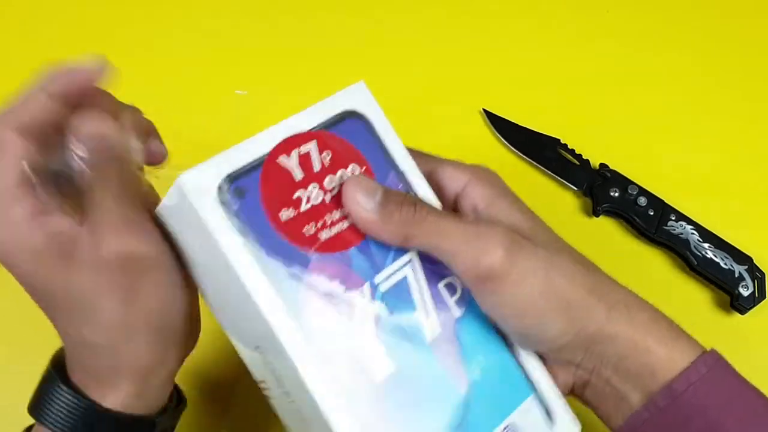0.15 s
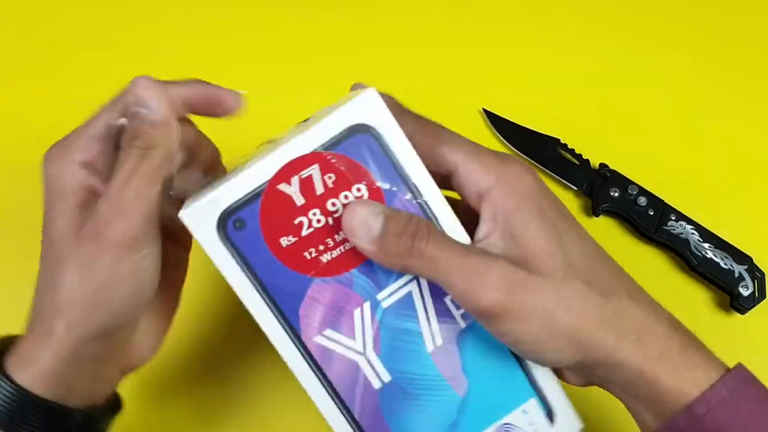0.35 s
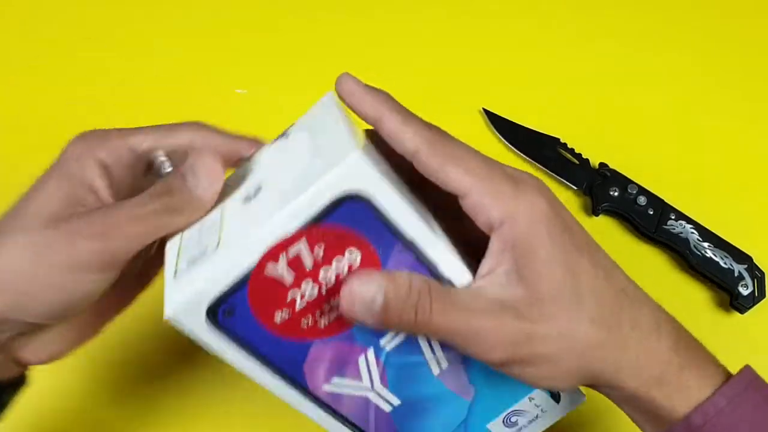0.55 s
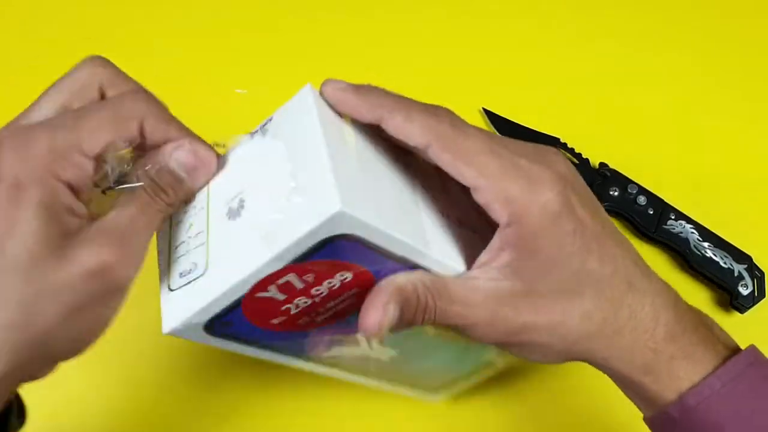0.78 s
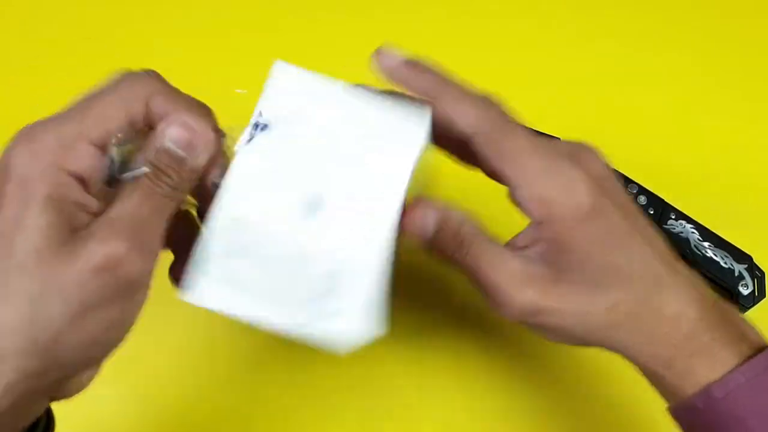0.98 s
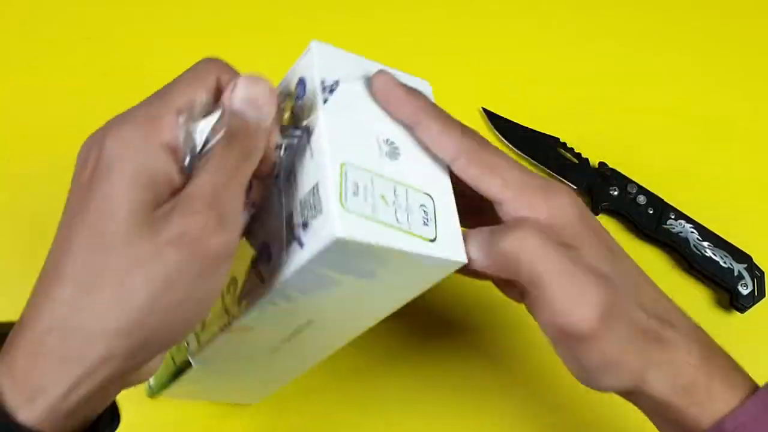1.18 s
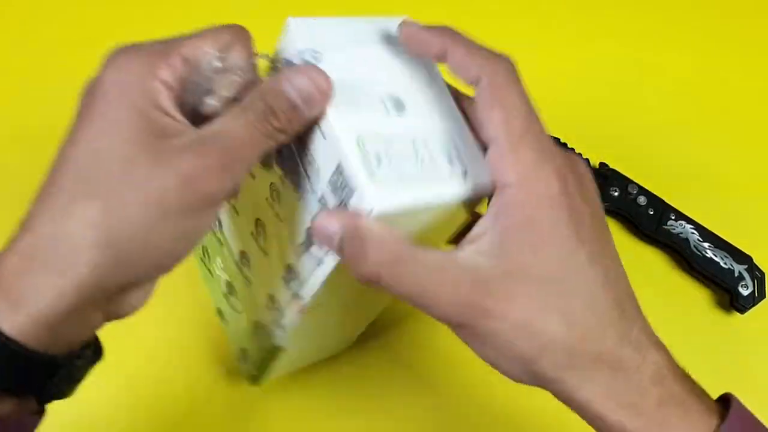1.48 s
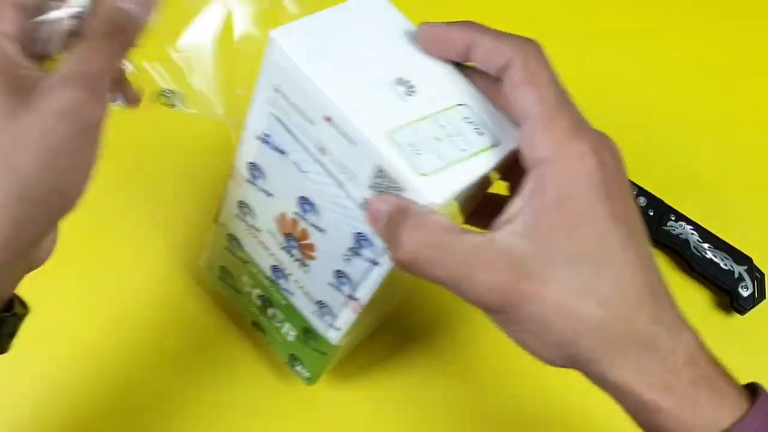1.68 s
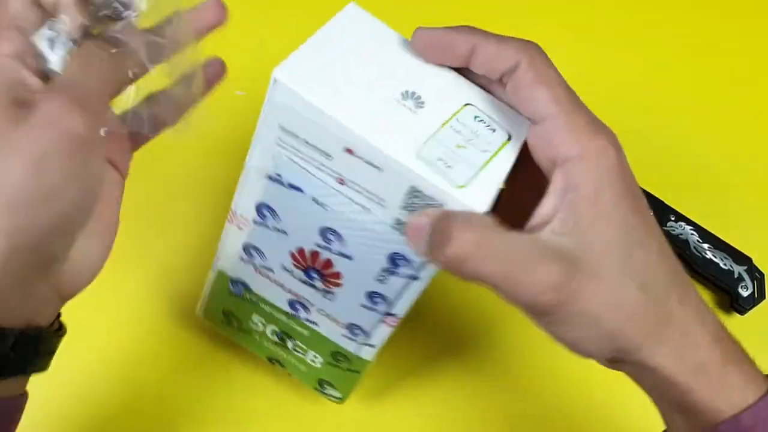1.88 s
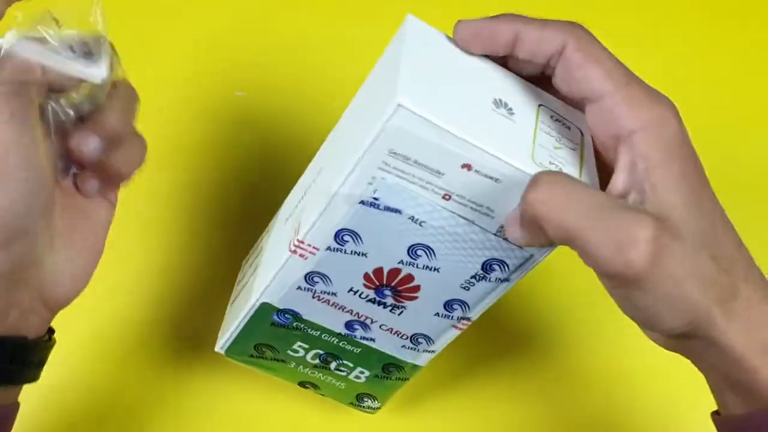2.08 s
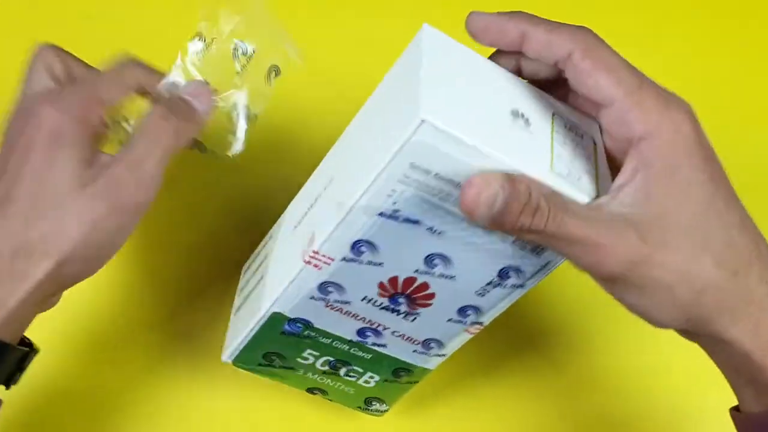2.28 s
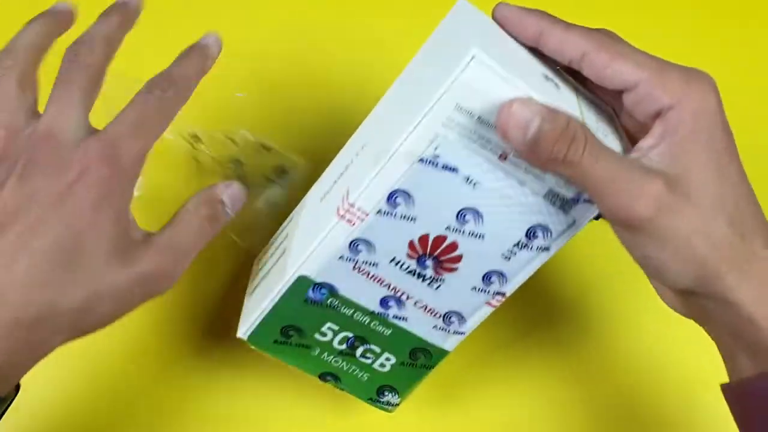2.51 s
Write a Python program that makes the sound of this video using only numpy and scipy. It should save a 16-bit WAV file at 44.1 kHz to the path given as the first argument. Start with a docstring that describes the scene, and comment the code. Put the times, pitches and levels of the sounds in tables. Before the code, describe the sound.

Thin plastic wrap crinkles close to the microphone as it is pulled off a cardboard box. The box bumps dully a few times, and the scrunching grows louder with sharp snaps, then eases, in a small room.

```python
"""Thin plastic shrink wrap is pulled off a cardboard box and scrunched in one hand, in a small room.
From the start, tiny creases crackle, sliding film rustles and bigger creases buckle in sharp snaps.
Soon the box is turned over and bumps on the table, again and again. Halfway through, the film slips
over an edge with a thin hiss. The scrunching gets louder, then eases. The room rings after each sound."""
import sys
import numpy as np
from scipy import signal
from scipy.fft import rfft, irfft
from scipy.io import wavfile
from scipy.ndimage import uniform_filter1d

SR = 44100
rng = np.random.default_rng(int(sys.argv[2]) if len(sys.argv) > 2 else 0)


def digitize_waveform(pressure):
    """Quantize a signal to 16-bit integers and store it at the path in sys.argv[1].

    Rows of a 2-D input are taken as channels; values are limited to [-1, 1].
    """
    field = np.atleast_2d(pressure).T
    bounded = np.clip(field, -1, 1)
    quanta = np.round(bounded * 32767).astype(np.int16)
    wavfile.write(sys.argv[1], SR, quanta)


N = 116865
TIME_S = np.arange(N) / SR
SIZE, CRACK_AT = 2048, 128  # in samples: the space for building one click, and where its crack falls
BINS_HZ = np.fft.rfftfreq(SIZE, 1 / SR)
RING_OCTAVES = 0.17  # width of the pitch band in which a patch of film rings


def amp(db):
    """Turns decibels into a number to multiply a sound by."""
    return 10 ** (np.asarray(db) / 20)


def unit(x):
    """Scales a sound to an average (rms) level of 1."""
    return x / np.sqrt(np.mean(x ** 2) + 1e-20)


def read(points, hz):
    """Looks up a table's value at any pitch, gliding between its rows."""
    pitch_hz, value = np.transpose(points)
    return np.interp(np.log(hz + 1), np.log(pitch_hz), value)


def add(mix, start_s, sound):
    """Mixes a sound in at the given time."""
    part = mix[max(round(start_s * SR), 0):][:len(sound)]
    part += sound[:len(part)]


def noise(tone):
    """Steady noise at level 1, shaped by a table of pitch_hz, level_db."""
    gain = amp(read(tone, np.fft.rfftfreq(N, 1 / SR)))
    return unit(irfft(rfft(rng.standard_normal(N)) * gain, N))


def hump(centre_hz, octaves):
    """A bell-shaped curve of height 1 around a pitch."""
    return np.exp(-.5 * (np.log2((BINS_HZ + 1) / centre_hz) / octaves) ** 2)


def struck_filter(tone_db):
    """A filter with the given tone that rings only after it is struck, never before."""
    log_gain = np.log(amp(np.r_[tone_db, tone_db[-2:0:-1]]))
    return np.exp(np.conj(signal.hilbert(log_gain)))[:len(tone_db)]


def buckle(tone_db, flutter_s, crack_share=0.18, creak_share=0.33):
    """One crease flips: a short creak, a sharp crack, then a quickly fading flutter."""
    t = (np.arange(SIZE) - CRACK_AT) / SR
    fade_s = flutter_s * np.where(t < 0, creak_share, 1)
    motion = rng.standard_normal(SIZE) * np.exp(-abs(t) / fade_s)
    motion *= np.sqrt(1 - crack_share) / np.linalg.norm(motion)
    motion[CRACK_AT] -= np.sqrt(crack_share)
    spectrum = rfft(motion)
    spectrum /= np.sqrt(uniform_filter1d(abs(spectrum) ** 2, size=50))  # even out chance peaks
    click = irfft(spectrum * struck_filter(tone_db))[:SIZE // 2]
    return click / np.linalg.norm(click)


def crackle(effort_db, patches=32, ring_db=9.5, size_spread_db=4.5):
    """Tiny creases flip on patches of film of many pitches; harder work flips more of them."""
    # tone of the tiny creases: pitch_hz, level_db
    crackle_tone = [(100, -8), (400, -28), (800, -30), (1300, 1), (2100, 1), (3200, 1.5), (4500, 1),
                    (6500, -1.5), (9000, -7.5), (12000, -15.5), (16000, -48)]
    crowding = amp(0.58 * effort_db)
    clicks_per_s = 500 * crowding
    sizes = amp(size_spread_db * np.minimum(rng.exponential(1, N), 3)) / np.sqrt(crowding)
    sizes *= rng.random(N) < clicks_per_s / SR
    patch = rng.integers(0, patches, N)
    octaves_up = np.log2(np.maximum(BINS_HZ, 1000) / 1000)
    out = np.zeros(N)
    for k, ring_hz in enumerate(np.geomspace(1800, 11000, patches)):
        brightness_db = 1.5 * rng.uniform(-0.81, 1) * octaves_up
        tone_db = read(crackle_tone, BINS_HZ) + ring_db * hump(ring_hz, RING_OCTAVES) + brightness_db
        click = buckle(tone_db, flutter_s=0.0013)
        out += signal.oaconvolve(sizes * (patch == k), click)[CRACK_AT:][:N]
    return amp(effort_db - 48.5) * unit(out)


def rustle(effort_db):
    """Sliding film rustles; this changes less with the hand's effort than the crackle does."""
    # tone of sliding film: pitch_hz, level_db
    rustle_tone = [(100, 0.5), (300, -3.5), (700, 4), (1300, 3), (2200, -8), (4500, 3), (8000, -3),
                   (12000, -14), (16000, -13)]
    # how much the film slides as it is worked: time_s, level_db
    sliding = [(1.15, 1), (1.34, -5), (1.62, -6), (1.72, 1)]
    sliding_db = np.interp(TIME_S, *np.transpose(sliding))
    return amp(0.81 * effort_db + sliding_db - 53.5) * noise(rustle_tone)


def scrunch(medium_db=-47):
    """The hand works the film, and both crackle and rustle follow its effort."""
    # how hard the film is worked: time_s, level_db
    hand_work = [(0, -48.5), (.176, -74), (0.188, -42), (.31, -38.5), (.345, -45), (.368, -40),
                 (.46, -39.5), (.52, -48.5), (.62, -47.5), (.79, -48), (0.851, -41.5), (.96, -38.5),
                 (1.01, -42), (1.06, -40.5), (1.2, -39), (1.279, -42), (1.351, -33), (1.43, -44.5),
                 (1.521, -38.5), (1.62, -44), (1.699, -37), (1.861, -33), (2.0, -36), (2.12, -37.5),
                 (2.149, -30.5), (2.26, -39), (2.316, -31), (2.43, -43.5), (2.52, -40.5), (2.65, -49.5)]
    effort_db = np.interp(TIME_S, *np.transpose(hand_work)) - medium_db
    return crackle(effort_db) + rustle(effort_db)


def air():
    """The quiet, low hush of the room."""
    # tone of the hush: pitch_hz, level_db
    air_tone = [(25, -26), (50, -23), (95, 8.5), (140, 1), (300, 4.5), (700, -4), (2000, -9), (6000, -9),
                (16000, -36)]
    return amp(-54.5) * noise(air_tone)


def snaps(ring_db=8, boost_db=21, flutter_stretch=2.16):
    """Big creases snap, each with the ring and tone of its own patch of film."""
    # creases, before boost and stretch: start_s, level_db, ring_hz, body_db, treble_db, flutter_s
    creases = [(0.0147, -46, 6250, 29, 13, 0.0012), (0.057, -37, 3200, 14, 6.5, 0.001),
               (0.1369, -34.5, 8300, 6, 5.5, 0.00051), (0.191, -35, 4390, 12, 8, 0.00046),
               (0.198, -28, 3450, -12, 0, 0.00064), (0.2093, -24, 3080, -5, -1.5, 0.0002),
               (0.2194, -30, 4570, -17, -2, 0.00053), (0.2237, -27, 2440, -12, -1, 0.00042),
               (0.2645, -32, 6070, -2, -19, 0.00099), (0.2881, -25.5, 2620, 4, 0, 0.0016),
               (0.306, -27.5, 6200, -5, 9, 0.0003), (0.31, -25.5, 4230, -24, 9.5, 0.0004),
               (0.366, -30.5, 3620, -14, 5, 0.0013), (0.375, -22, 2600, -14, 2.5, 0.00074),
               (0.3871, -27, 6250, -24, 8, 0.00051), (0.4285, -36, 2310, -18, -7, 0.00057),
               (0.4362, -29, 4380, -14, 4, 0.0014), (0.461, -33, 8100, 7, 18, 0.00091),
               (0.477, -31.5, 3450, 3, 2, 0.001), (0.6427, -36.1, 3770, -1, -1, 0.001),
               (0.6603, -36, 7200, 2, 5, 0.00089), (0.6653, -32, 3970, 4, 4, 0.0021),
               (0.7003, -22.5, 5450, 1, -5, 0.00063), (0.7324, -31, 4150, 8, 0, 0.00068),
               (0.7601, -22, 4100, 6, 2, 0.00082), (0.8296, -29, 5750, 2, 5, 0.00026),
               (0.849, -27.5, 4440, 2, 2, 0.0016), (0.8583, -31.5, 6000, 9, 8, 0.0005),
               (0.8847, -28, 3400, 6, -15, 0.00031), (0.902, -25, 6160, -8, 6, 0.00094),
               (0.9418, -27, 7200, 12, 9.5, 0.00058), (0.953, -19, 6400, -42, -9, 0.00033),
               (1.006, -21, 4130, -4, -1, 0.00052), (1.024, -22, 5500, 9.5, 3, 0.00092),
               (1.027, -16.5, 2300, -4.5, 4, 0.00046), (1.0328, -19.5, 3100, -30, -7, 0.0013),
               (1.0365, -15, 4340, -21, 5.5, 0.00022), (1.0455, -22, 7670, -1, -2, 0.00025),
               (1.0587, -14.5, 3270, -10, 8, 0.0004), (1.0756, -25.5, 4050, -2, 5, 0.00026),
               (1.0894, -22.5, 2170, 3, 2, 0.00044), (1.1441, -27, 3750, -3, 3, 0.00068),
               (1.149, -32, 4300, -16, 3, 0.00049), (1.1739, -32.5, 4200, -6, -15, 0.0006),
               (1.1878, -27.5, 9100, 3, -2, 0.00054), (1.196, -31, 7800, 15, 6, 0.0002),
               (1.244, -28, 4460, 0, -39, 0.00046), (1.3118, -23.5, 2080, -15, -41, 0.00058),
               (1.3205, -29.5, 4660, -12, 11, 0.00043), (1.3433, -21, 4170, -10, 1.5, 0.00036),
               (1.3679, -25.5, 7800, 2, 0, 0.00076), (1.3902, -32, 3170, -17, -2, 0.00035),
               (1.4016, -27, 6460, -8, 2, 0.00032), (1.4068, -33, 2450, -19, -20, 0.00064),
               (1.4322, -25, 4650, -3, -1, 0.0011), (1.456, -33, 9200, -11, 5, 0.00074),
               (1.47, -20.5, 4620, -33, -1.5, 0.00073), (1.4837, -23, 1770, 4, -8, 0.00083),
               (1.495, -28, 5500, -10, 4, 0.0003), (1.503, -23, 3900, 3, 1.5, 0.00068),
               (1.5287, -27, 4440, -2, 4, 0.0011), (1.5448, -25, 5800, 7, 8, 0.00078),
               (1.5485, -28, 3800, -14, -2, 0.00033), (1.5705, -33.5, 3060, -12, 4, 0.00028),
               (1.591, -32.5, 4500, 0, -6, 0.00055), (1.6422, -22, 8400, -0.5, -4.5, 0.0006),
               (1.6673, -19, 4900, 7.5, 8.5, 0.00044), (1.679, -23.5, 3930, -2, -9, 0.00045),
               (1.6859, -22.5, 7350, -3, -1, 0.0011), (1.694, -18, 6400, 6.5, 3, 0.0043),
               (1.704, -19.5, 11400, 0, 4.5, 0.00068), (1.7099, -13, 2460, -5, 1.5, 0.0023),
               (1.7343, -16.5, 4330, 10.5, 1, 0.00086), (1.7472, -23, 5760, 3, 1, 0.0015),
               (1.765, -24, 6140, -8, -1, 0.00092), (1.7847, -15, 5400, -13, -1, 0.0011),
               (1.8231, -14, 2150, -4, -5, 0.00053), (1.8415, -25, 3880, 4, 9, 0.00046),
               (1.8453, -23, 2050, -4, 4, 0.00023), (1.8502, -24, 7650, 8, 12, 0.0008),
               (1.8544, -23, 3570, -5, 0, 0.00083), (1.8709, -22.5, 5840, -1, 4, 0.00058),
               (1.9147, -25, 2210, 0, 4, 0.00035), (1.9404, -18.5, 8400, -3, -1, 0.000089),
               (1.968, -22, 4170, -3, -2, 0.00034), (2.0354, -27, 5170, -42, -8, 0.00016),
               (2.0855, -21.5, 3280, -15, -4, 0.00036), (2.1348, -19, 3500, -13, -6, 0.0025),
               (2.141, -23, 3430, -9, 0, 0.0008), (2.1434, -20, 4230, -11, -11, 0.00044),
               (2.2004, -19, 7600, 12.5, 17.5, 0.00066), (2.2043, -20.5, 4800, -3, 3, 0.0041),
               (2.2753, -27.5, 2380, 12, -20, 0.0014), (2.2887, -28, 4400, -11, 7, 0.0017),
               (2.2962, -22, 4450, -7, 8, 0.00095), (2.3098, -24.5, 4350, 14.5, 4, 0.00072),
               (2.3211, -21.5, 4200, 6, 6, 0.0011), (2.3878, -30, 3930, 5, -6, 0.0016),
               (2.396, -27.5, 6000, -14, 3, 0.00062), (2.4019, -28, 2160, 3, -8, 0.001),
               (2.4854, -32.5, 7020, 25, 9.5, 0.002), (2.5107, -29.5, 3900, 17, 2, 0.00086),
               (2.524, -32, 5900, 17, 6, 0.00084)]
    # tone shared by all snaps: pitch_hz, level_db
    film_tone = [(60, -23), (200, -10.5), (400, -9.5), (800, -10.5), (1300, -3), (2100, -2.5), (3000, -1.5),
                 (4200, -1.5), (6000, -4), (8000, -7), (11000, -11.5), (14000, -17), (16000, -26)]
    body = BINS_HZ / (BINS_HZ + 140) / (1 + (BINS_HZ / 1450) ** 4)  # film is too light for deep bass
    treble = 1 - 1 / (1 + (BINS_HZ / 6700) ** 6)
    out = np.zeros(N)
    for start_s, level_db, ring_hz, body_db, treble_db, flutter_s in creases:
        tone_db = read(film_tone, BINS_HZ) + ring_db * hump(ring_hz, RING_OCTAVES)
        tone_db += body_db * body + treble_db * treble
        snap = buckle(tone_db, flutter_stretch * flutter_s)
        add(out, start_s - CRACK_AT / SR, amp(level_db + boost_db) * snap)
    return out


def hollow(film):
    """Close echoes off the box and table make the film sound hollow."""
    # peaks and dips made by the echoes: pitch_hz, level_db
    echo_tone = [(1700, -1), (2250, 3), (2680, -3), (2950, 1), (3220, 2), (3560, -2.5), (3950, 0.5),
                 (4500, 0), (4900, -1), (5200, 0)]
    echoes = irfft(struck_filter(read(echo_tone, BINS_HZ)))[:SIZE // 2]
    return signal.oaconvolve(film, echoes)[:N]


def room(sound, build_s=0.0011):
    """Echoes from the walls blur into a short tail that lasts longest in the bass."""
    # time the room takes to fade by 60 dB: pitch_hz, ring_s
    ring_times = [(100, 0.88), (400, 0.48), (1200, 0.38), (3500, 0.51), (8000, 0.22), (15000, 0.35)]
    # tone of the tail: pitch_hz, level_db
    tail_tone = [(100, -1), (400, -4), (1000, -4.5), (2200, -7.5), (5000, -10), (9000, -9), (15000, -11.5)]
    hz, t, spectrum = signal.stft(rng.standard_normal(SR), SR, nperseg=256)
    ring_s = read(ring_times, hz)[:, None]
    fade = np.exp(-np.log(1000) * t / ring_s)
    same_energy = np.sqrt(2 * np.log(1000) / (ring_s * SR))  # a longer ring adds no extra energy
    spectrum *= fade * amp(read(tail_tone, hz))[:, None] * same_energy
    tail = signal.istft(spectrum, SR, nperseg=256)[1]
    fade_in = np.minimum(np.arange(len(tail)) / SR / build_s, 1)
    return signal.fftconvolve(sound, tail * fade_in)[:N]


def box_bumps(reach_octaves=0.22):
    """Each bump is a dull push with a cardboard scuff; it wakes the low booms near its pitch."""
    # the box hits the table (levels are relative): start_s, level_db, pitch_hz, rise_s, decay_s, scuff_db
    bumps = [(.184, -40, 293, 0.0022, 0.0082, 1.5), (0.507, -38.5, 196, 0.003, 0.0091, -1.5),
             (0.532, -26, 64.5, 0.012, 0.023, -10.5), (.548, -37.5, 168, 0.0047, 0.012, -15),
             (0.647, -34.5, 80, 0.0022, 0.0071, -3), (1.025, -28, 226, 0.0074, 0.013, -6.5),
             (1.032, -26, 360, 0.0012, 0.0053, -7), (1.12, -44.5, 133, 0.008, 0.039, 5),
             (1.288, -40, 234, 0.004, 0.013, 0), (1.439, -30, 86, 0.0066, 0.0094, -7),
             (1.608, -40.5, 230, 0.0046, 0.018, 0), (1.708, -27.5, 540, 0.0015, 0.0056, -1),
             (1.731, -18.5, 374, 0.0038, 0.0018, -2), (1.782, -20.5, 540, 0.0021, 0.0019, -4.5),
             (1.799, -42, 50, 0.0074, 0.028, -19), (2.03, -45.5, 58.7, 0.012, 0.064, -19)]
    # tone of scuffed cardboard: pitch_hz, level_db
    cardboard_tone = [(40, -17), (90, -0.5), (170, 6), (350, -4.5), (560, -2.5), (900, -17.5), (2000, -13),
                      (8000, -34)]
    # low notes of the table and room: pitch_hz, level_db, ring_s (time to fade by 60 dB)
    booms = [(80, -22, 0.4), (172, -6, 0.8), (222, -6, 0.5), (360, -25, 0.24)]
    t = np.arange(SR // 2) / SR
    scuff = noise(cardboard_tone)
    out = np.zeros(N)
    for start_s, level_db, pitch_hz, rise_s, decay_s, scuff_db in bumps:
        swell = (1 - np.exp(-t / rise_s)) ** 2
        shape = swell * np.exp(-t / decay_s)
        push = np.sin(2 * np.pi * pitch_hz * t) + amp(scuff_db) * scuff[round(start_s * SR):][:len(t)]
        bump = shape / shape.max() * push
        for boom_hz, boom_db, ring_s in booms:
            closeness = np.exp(-.5 * (np.log2(boom_hz / pitch_hz) / reach_octaves) ** 2)
            fade = np.exp(-np.log(1000) * t / ring_s)
            bump += amp(boom_db) * closeness * swell * fade * np.sin(2 * np.pi * boom_hz * t)
        add(out, start_s, amp(level_db + 2.5) * bump / 2)
    return out


def slip(peak_s=1.287, spread_s=0.014, level_db=-47.5):
    """The film slides over an edge of the box with a brief, thin hiss."""
    band = np.interp(np.fft.rfftfreq(N, 1 / SR), BINS_HZ, hump(centre_hz=13000, octaves=0.3))
    hiss = unit(irfft(rfft(rng.standard_normal(N)) * band, N))
    swell = np.exp(-.5 * ((TIME_S - peak_s) / spread_s) ** 2)
    return amp(level_db) * swell * hiss


def scene():
    """Film and box close by, with the room's ring and quiet air, in one channel."""
    near = hollow(snaps() + scrunch()) + slip() + box_bumps()
    return (near + room(near) + air())[None]


def record(dry, low_cut_hz=42, high_cut_hz=15830):
    """Trims away the deepest rumble and the very highest treble."""
    low_cut = signal.butter(4, low_cut_hz, "high", fs=SR, output="sos")
    high_cut = signal.firwin(511, high_cut_hz, window=("kaiser", 9), fs=SR)
    return signal.oaconvolve(signal.sosfilt(low_cut, dry), high_cut[None], "same")


dry = scene()
out = record(dry)
digitize_waveform(out)
```